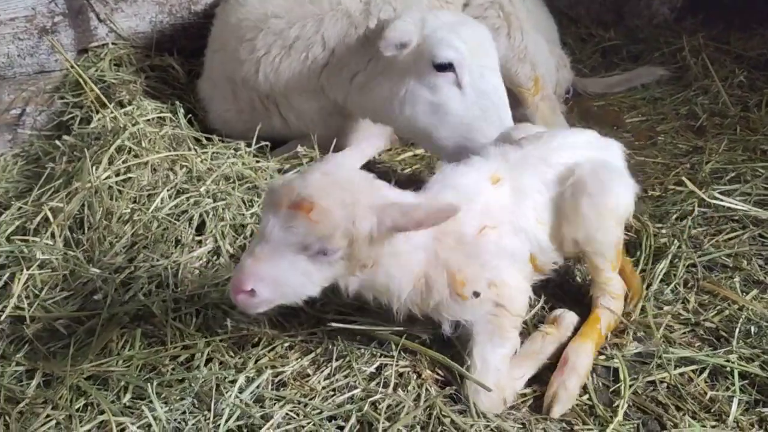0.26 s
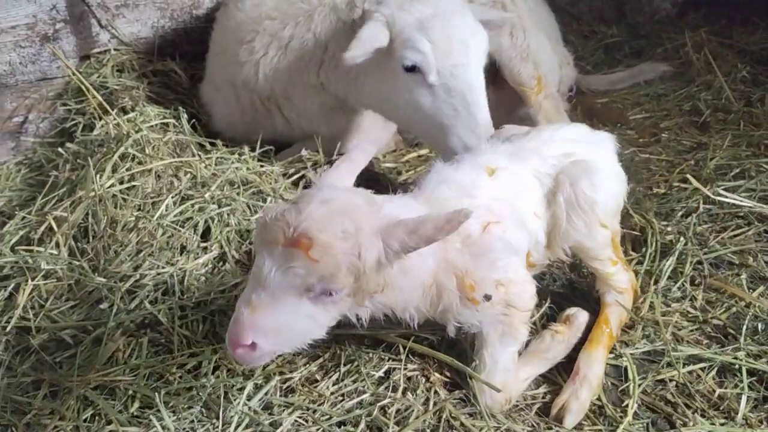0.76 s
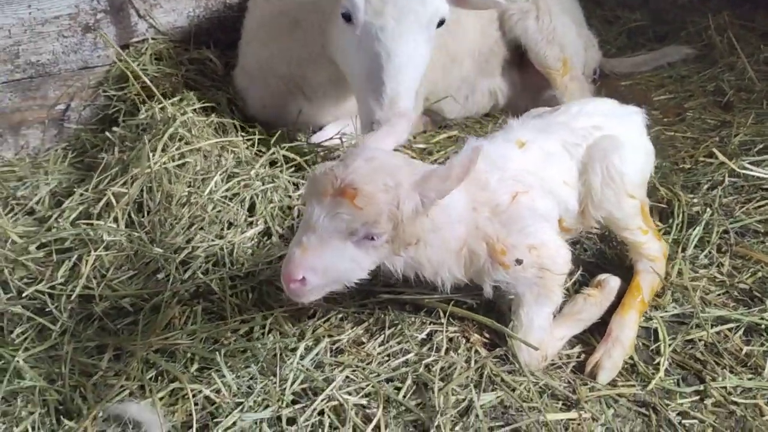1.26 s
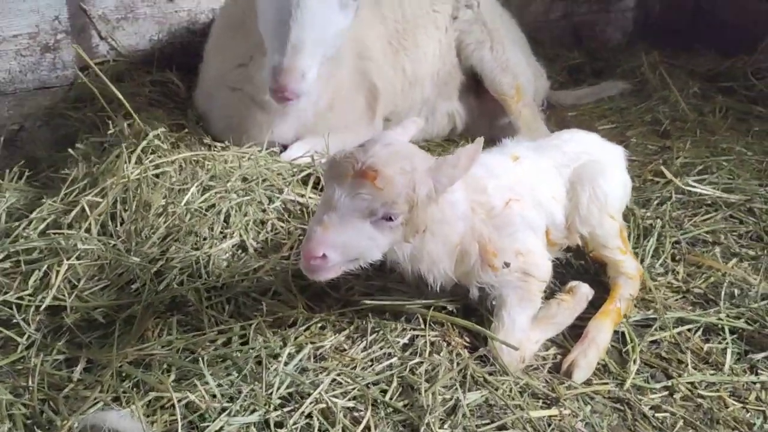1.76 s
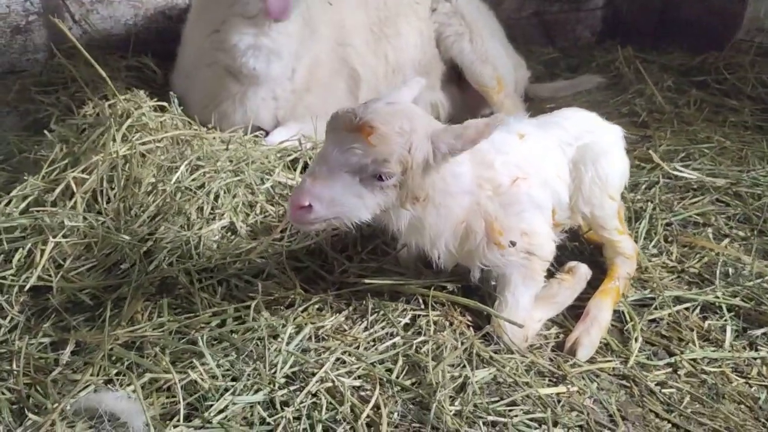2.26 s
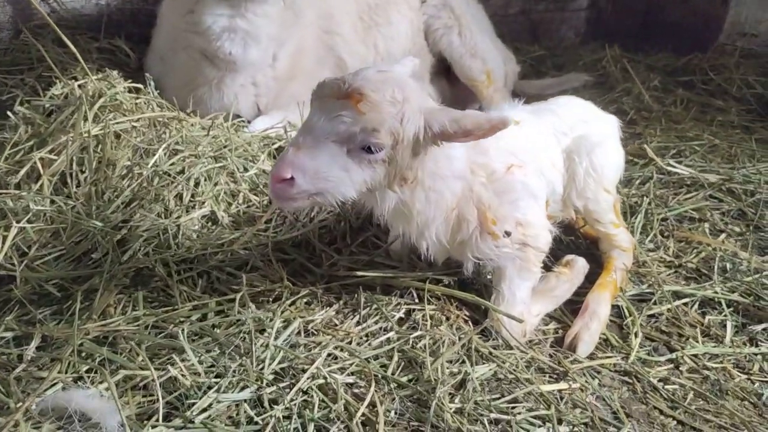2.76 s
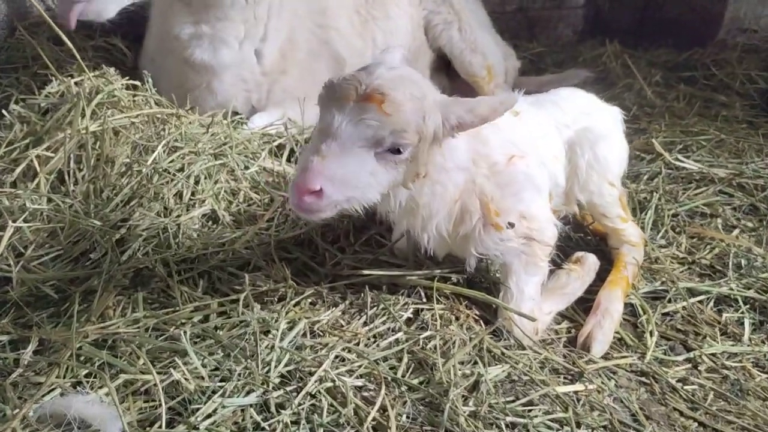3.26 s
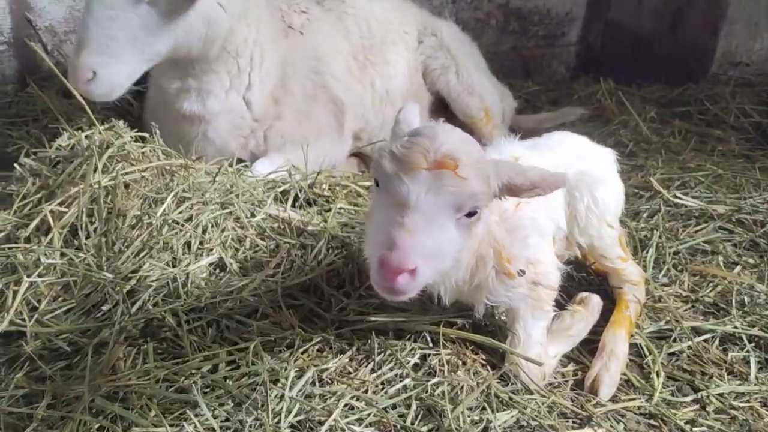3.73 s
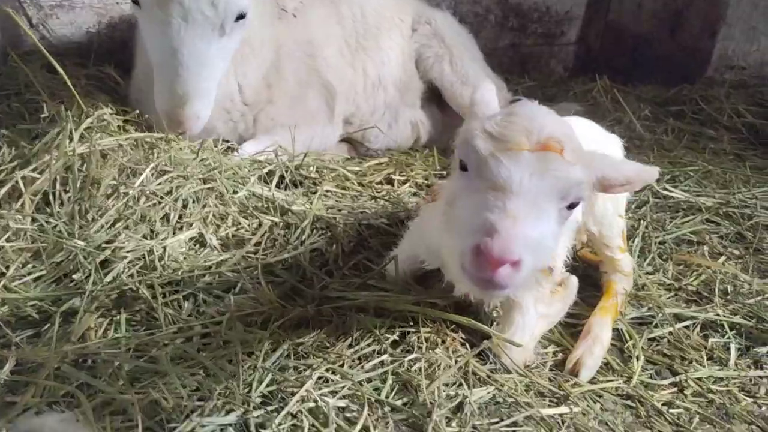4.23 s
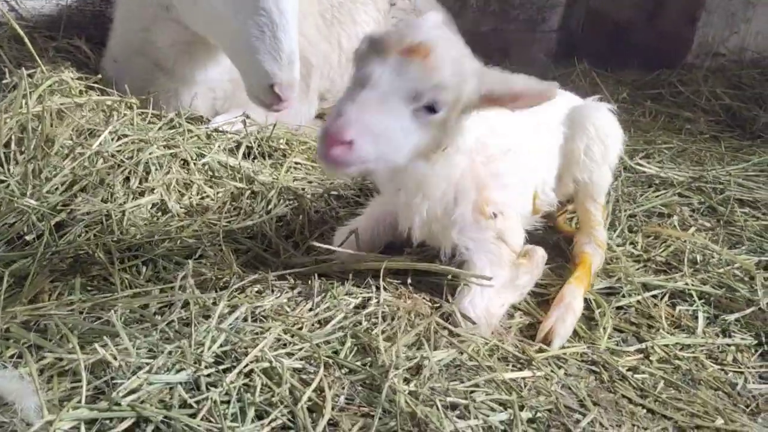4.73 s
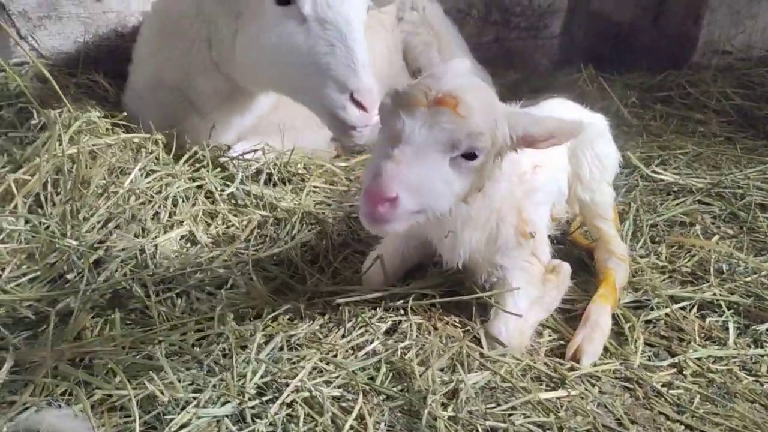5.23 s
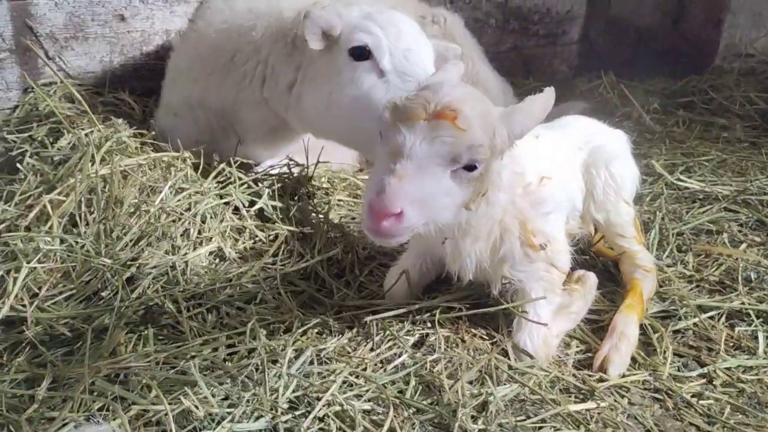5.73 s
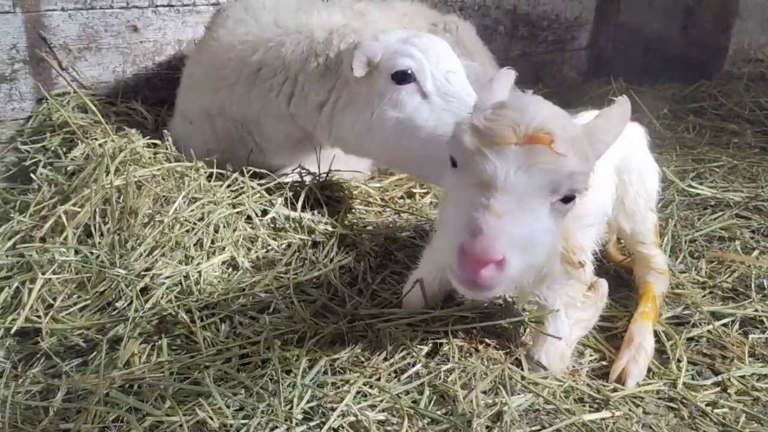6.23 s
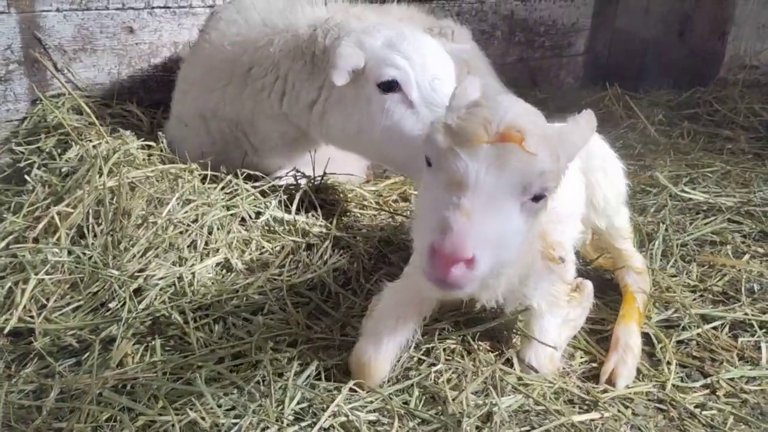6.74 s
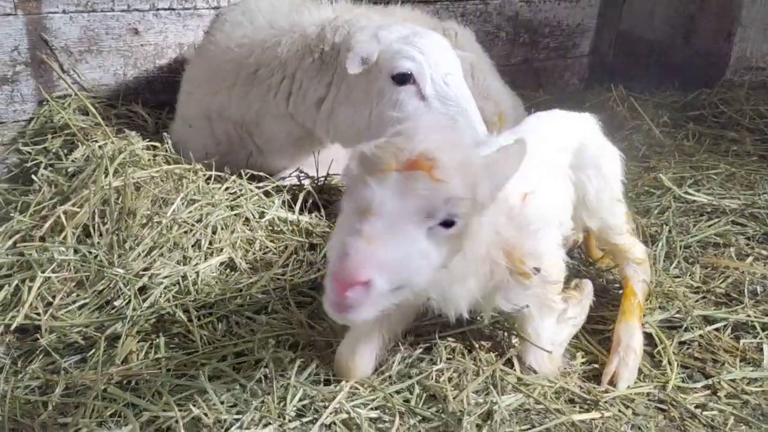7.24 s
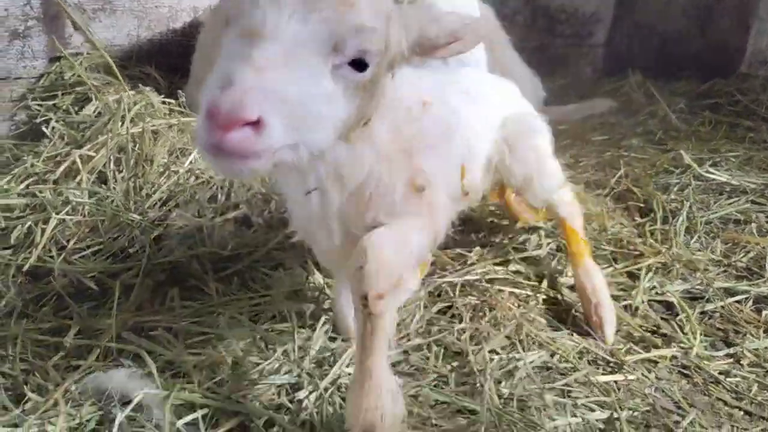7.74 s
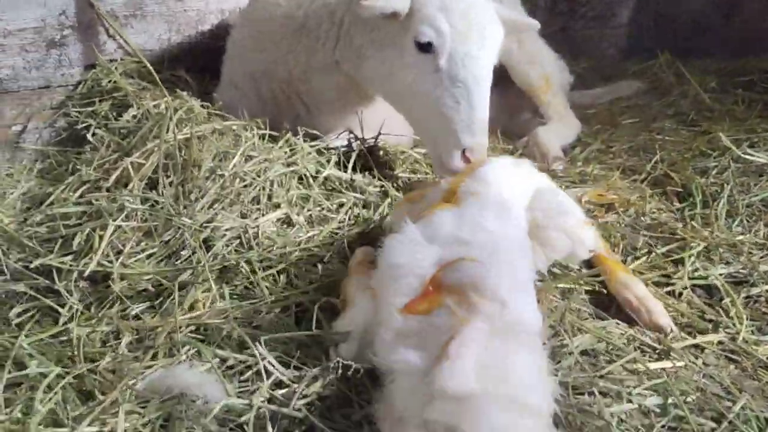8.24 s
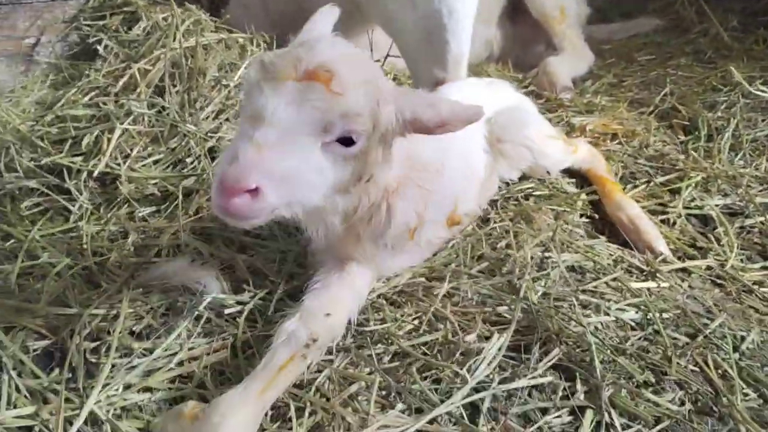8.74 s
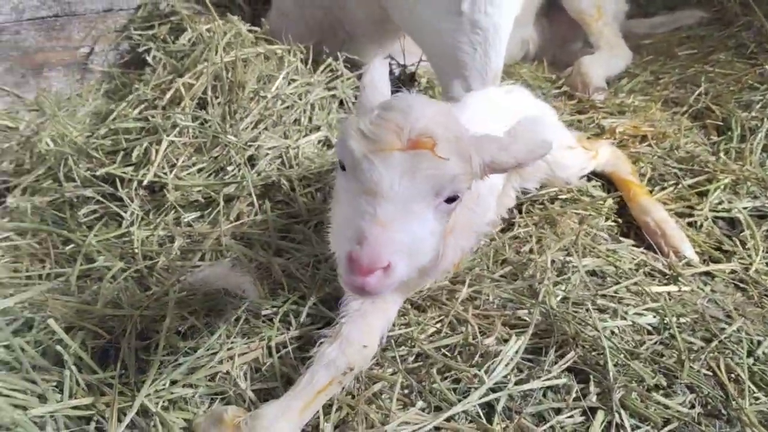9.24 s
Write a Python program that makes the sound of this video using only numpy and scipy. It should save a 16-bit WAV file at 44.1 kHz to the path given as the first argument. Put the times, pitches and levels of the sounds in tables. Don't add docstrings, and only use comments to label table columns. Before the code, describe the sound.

Quiet barn air and dry stalks ticking; then a small indrawn breath and a bright, nasal, trembling lamb bleat, very near, with the ewe murmuring low beneath. Later come a soft thump, tiny wet licking, a clipped bleat, a pause with straw snaps, and a second long wavering bleat. A sharp rustling fall and a faint hoarse far sheep close it, with only a short room tail.

```python
import sys
import numpy as np
from scipy import signal
from scipy.fft import rfft, irfft, next_fast_len
from scipy.io import wavfile
from scipy.ndimage import uniform_filter1d, map_coordinates

SR = 44100
rng = np.random.default_rng(int(sys.argv[2]) if len(sys.argv) > 2 else 0)


def log_audio(samples):
    frames = np.atleast_2d(samples).T
    limited = np.clip(frames, -1, 1)
    pcm = np.round(limited * 32767).astype(np.int16)
    wavfile.write(sys.argv[1], SR, pcm)


def to_linear_factor(level_db):
    exponent = np.asarray(level_db, float) / 20
    return 10 ** exponent


N = 418509


def unit(x):
    return x / np.sqrt(np.mean(x ** 2) + 1e-20)


def along(points, hz):
    f, v = np.transpose(points)
    return np.interp(np.log(hz + 1), np.log(f + 1), v)


def level(rows):
    return np.interp(np.arange(N) / SR, *np.transpose(rows))


def bump(s, centre, width):
    return np.exp(-((s - centre) / width) ** 2)


def wobble(rate, count):
    knots = rng.standard_normal(int(count * rate / SR) + 4)
    return map_coordinates(knots, [np.arange(count) * rate / SR])


def filtered(x, response):
    m = next_fast_len(N + SR // 2)
    return irfft(rfft(x, m) * response(np.fft.rfftfreq(m, 1 / SR)), m)[..., :N]


def hiss(spectrum, alike=0):
    own, shared = rng.standard_normal((2, N)), rng.standard_normal(N)
    mixed = np.sqrt(1 - alike) * own + np.sqrt(alike) * shared
    return unit(filtered(mixed, lambda hz: to_linear_factor(along(spectrum, hz))))


def voice(s, pitch, db, throat, rough, trim=None, jitter=.002, order=1, clear_hz=1):
    step = 64
    start, n = round(s[0] * SR), round((s[-1] - s[0]) * SR)
    t = np.arange(0, n + step, step)

    def at(curve):
        return np.interp((start + t) / SR, s, curve * np.ones(len(s)))

    f0 = np.interp((start + t) / SR, *np.transpose(pitch))
    k = np.arange(1, int(16000 / f0.min()))[:, None]
    f = k * f0
    tract = 0
    for j, (centre, width, db_peak) in enumerate(throat):
        damping = 1j * f * width
        tract = tract + (-1) ** j * to_linear_factor(db_peak) * damping / (at(centre) ** 2 - f * f + damping)
    tract = tract ** order
    tract = tract / np.sqrt(np.sum(abs(tract) ** 2, 0) / 2)
    if trim:
        tract = tract * to_linear_factor(trim(f, at))
    shape = irfft(np.log(abs(np.vstack([tract[:1], tract])) + 1e-5), axis=0)
    shape[len(k) + 1:] = 0
    tract = abs(tract) * np.exp(2j * rfft(shape, axis=0).imag[1:])
    share = np.clip(at(rough), 0, 1) / (1 + (clear_hz / f) ** 2)
    smear = rng.standard_normal(f.shape) + 1j * rng.standard_normal(f.shape)
    patches = uniform_filter1d(rng.standard_normal(f.shape), size=40, axis=1)
    patches = uniform_filter1d(patches, size=3, axis=0)
    patch_db = 2 / (1 + (1800 / f) ** 4) + 3.5 / (1 + (7500 / f) ** 4)
    tract = tract * to_linear_factor(unit(patches) * patch_db)
    size = to_linear_factor(at(db)) * tract * (np.sqrt(1 - share) + np.sqrt(share) * smear)
    i = np.arange(n)
    turns = np.cumsum(np.interp(i, t, f0) * (1 + jitter * wobble(90, n))) / SR
    part = (i % step) / step
    after = np.minimum(i // step + 1, len(t) - 1)
    size = size[:, i // step] * (1 - part) + size[:, after] * part
    out = np.zeros(N)
    overtones = np.real(size * np.exp(2j * np.pi * k * turns))
    out[start:start + n] = overtones.sum(0) * signal.windows.tukey(n, min(1, 400 / n))
    return out


# start_s, level_db
STIR = [(0, -71.5), (.372, -63), (.86, -75), (1.24, -74.5), (2.1, -63), (2.54, -65.5), (2.8, -62.5),
        (3.0, -71.5), (3.57, -72), (3.79, -78.5), (4.1, -73), (5.4, -71), (5.85, -74), (6.636, -64),
        (6.92, -73.5), (7.78, -59), (8.2, -67), (8.65, -70)]


def stirring():
    return level(STIR)


# start_s, level_db
RUMBLE = [(0, -71.5), (.9, -72.5), (1.42, -60.5), (2.13, -61), (2.4, -70), (3.24, -67), (3.65, -74.5),
          (4.25, -74), (5.6, -64.5), (6.6, -77), (7.3, -66), (7.85, -72.5), (8.07, -62), (8.45, -71),
          (9.35, -63)]
# freq_hz, density_db (per Hz)
RUMBLE_COLOUR = [(15, -44.5), (25, -19.5), (48, -10.5), (70, -3.5), (92, 2), (188, -3.5), (400, -19.5),
                 (520, -52.5), (880, -120)]
# freq_hz, density_db (per Hz)
AIR_COLOUR = [(88, -17), (150, -11.5), (309, -1.5), (1210, -10), (3620, -17), (4490, -25), (8730, -7),
              (16000, -18.5)]


def barn():
    lumps, rumble_db, stir_db = to_linear_factor(4.5 * wobble(3.9, N)), level(RUMBLE), stirring()
    air_db = -72.5 + 0.44 * (stir_db - stir_db.mean()) + 0.82 * (rumble_db - rumble_db.mean())
    rumble = to_linear_factor(rumble_db) * unit(lumps * hiss(RUMBLE_COLOUR, 0.87))
    air = to_linear_factor(air_db + 7.0 + 0.68 * wobble(6.2, N)) * hiss(AIR_COLOUR, 0.059)
    return rumble + air


# peak_s, peak_db, dull_db, pan_db (twice the level difference between the ports)
SNAPS = [(0.1135, -52, -2.5, -5), (0.5837, -54.5, 3, 11), (0.673, -37.5, -16.5, 8),
         (1.039, -45.5, -30, 6.5), (1.1834, -54, -5.5, -5), (2.2936, -47, -26.5, 9),
         (2.4499, -38.5, -15.5, 4), (2.7112, -38.5, -28, -19), (2.971, -48, -29.5, 0),
         (3.374, -49, -31, -1), (3.448, -46.5, -31, 6), (3.644, -45, -24, 3), (3.6959, -29.5, -47.5, -16),
         (4.076, -44.5, -29.5, -5.5), (4.4552, -41, -37, -14), (5.202, -51, -19.5, 4),
         (5.448, -39, -28, 21), (5.6522, -30, -23, 8.5), (5.86, -40.5, -14.5, 4.5), (6.071, -45, -13, 12),
         (6.465, -31, -21, 1.5), (6.863, -43, -36, 11.5), (6.87, -28, -16.5, 6), (6.9406, -34.5, -42, 11),
         (7.787, -37, -33, 8.5), (7.874, -39.5, -29, 10.5), (7.9913, -18, -38, 14), (8.5725, -46, -11.5, 7),
         (8.589, -48, -30, 9), (8.6106, -35, -26.5, 15.5), (8.657, -48.5, -30.5, -2)]
# centre_s, peak_db, dull_db, half_width_s
SWEEPS = [(0.193, -64, -3.5, 0.043), (0.381, -53.5, -13, 0.0061), (.445, -56, -23, 0.011),
          (0.684, -51, -22, 0.021), (1.095, -58, -33, 0.026), (2.061, -50, -13.5, 0.012),
          (2.775, -56, -14, 0.032), (3.43, -57.5, -32.5, 0.02), (3.715, -51.5, -39, 0.026),
          (4.04, -63.5, -30, 0.024), (4.764, -50.5, -27.5, 0.02), (5.212, -61, -13, 0.01),
          (6.092, -57.5, -8.5, .015), (6.896, -53.5, -10.5, 0.013), (7.805, -41, -27, 0.023),
          (7.891, -47.5, -28, 0.02), (8.009, -35.5, -18.5, 0.024), (8.2, -50, -37, 0.021),
          (8.25, -47, -26, 0.033)]
# freq_hz, density_db (per Hz)
STRAW_COLOUR = [(880, -12.5), (1500, -12), (1920, -13.5), (2410, -18.5), (3310, -15), (7540, 8.5),
                (8570, 16.5), (11000, 9), (16000, 0.5)]


def straw():
    ticks = (rng.random(N) < 45 / SR) * rng.exponential(size=N)
    ticks = signal.fftconvolve(ticks, np.hanning(90), "same")
    stir_db = stirring()
    clumps = unit(to_linear_factor(4.6 * wobble(30, N) + 2.5 * wobble(440, N)) * (1 + 1.4 * ticks))
    bright, dull = to_linear_factor(3 + stir_db) * np.ones((2, 1)), np.zeros((2, N))
    u = np.arange(SR // 4) / SR

    for s, db, dull_db, pan_db in SNAPS:
        start = round((s - .0025) * SR)
        t60_s = 0.052 * to_linear_factor(.1 * (stir_db[start] - stir_db.mean()))
        decay = to_linear_factor(-60 * u / np.clip(t60_s, .02, .3)) * (1 - np.exp(-u / 0.0033))
        crack = 0.6 * np.exp(-abs(u - .003) / 0.00078)
        shape = to_linear_factor(db - 4.5) * (decay + crack) * to_linear_factor([[pan_db / 4], [-pan_db / 4]])
        shape = shape[:, :N - start]
        bright[:, start:start + len(u)] += shape
        dull[:, start:start + len(u)] += shape * to_linear_factor(dull_db)

    for s, db, dull_db, width in SWEEPS:
        start = round(s * SR) - len(u) // 2
        shape = to_linear_factor(db) * bump(u, u.mean(), width) * to_linear_factor([[7 / 4], [-7 / 4]])
        bright[:, start:start + len(u)] += shape
        dull[:, start:start + len(u)] += shape * to_linear_factor(dull_db)

    dull_colour = [(500, -38.0), (1000, 0.5), (2500, -1.0), (4500, -9), (7000, -43.0)]
    return clumps * bright * hiss(STRAW_COLOUR) + dull * hiss(dull_colour, 0.084)


# start_s, peak_db, pitch_hz, t60_s
THUMPS = [
    (4.125, -58, 94.2, 0.2),
    (4.886, -58, 123.3, 0.11),
    (4.966, -34.5, 98.2, 0.091),
    (5.017, -46.5, 90, 0.074),
    (5.07, -51, 95, 0.061),
    (7.996, -25, 96.5, 0.066),
]


def thumps():
    out, t = np.zeros(N + SR), np.arange(SR // 4) / SR
    for s, db, hz, t60 in THUMPS:
        push = to_linear_factor(db + 6.5 - 60 * t / t60) * (1 - np.exp(-t / 0.0125))
        tone = np.sin(2 * np.pi * hz * t) + 0.37 * np.sin(4.6 * np.pi * hz * t)
        out[round(s * SR):][:len(t)] += push * tone
    return out[:N]


# start_s, pitch_hz, hum_db, mouth_db (opening)
FAR = [
    (8.52, 154.3, -75, -3),
    (8.563, 173.6, -49, -30),
    (8.664, 164.5, -52, -15.5),
    (8.785, 152.6, -42, 2),
    (8.838, 125, -44.5, 8.5),
    (8.95, 125, -48, 15.5),
    (9.067, 121.2, -45.5, 10),
    (9.165, 106.7, -48.5, -1),
    (9.225, 110.6, -74, 3),
]
# centre_hz, width_hz, peak_db
FAR_HUM = [(125, 65, 0), (223, 80, 1.5)]
# centre_hz, width_hz, peak_db
FAR_RASP = [(603, 138, 1.5), (1100, 350, -5.5), (2280, 660, -17), (4920, 950, -18.5), (9100, 700, -14.5)]


def far_sheep():
    s, hz, hum_db, open_db = np.transpose(FAR)
    mouth_hz = 1510 - 6.5 * open_db + 510 * (s > 9.08)
    pitch = np.transpose([s, hz])
    throat = FAR_RASP[:2] + [(mouth_hz, 600, -1.5)] + FAR_RASP[2:]
    rasp = voice(s, pitch, hum_db + open_db, throat, .5, jitter=.05, order=2)
    hum = voice(s, pitch, hum_db, FAR_HUM, 0.28, jitter=0.045, order=2)
    return hum, rasp


# start_s, pitch_hz, level_db, mouth_db (opening)
EWE = [
    (1.22, 166.4, -113, -3),
    (1.301, 168.2, -57.5, 10),
    (1.37, 183.5, -48, 3),
    (1.47, 195.3, -41, 2),
    (1.599, 199.5, -38, 2),
    (1.802, 196.5, -40.5, 0.5),
    (2.028, 190.9, -40, 2),
    (2.2, 181.9, -42.5, 7),
    (2.295, 171.3, -58.5, 1),
]
# centre_hz, width_hz, peak_db
EWE_THROAT = [(188, 200, -5), (1790, 240, -4), (2400, 300, -8.5)]
# centre_s, half_width_s, loss_db
EWE_CATCHES = [
    (2.137, 0.012, 10),
    (2.215, 0.0094, 6),
]


def ewe():
    knots, *arc = np.transpose(EWE)
    s = np.linspace(knots[0], knots[-1], num=200)
    hz, db, open_db = (np.interp(s, knots, c) for c in arc)
    db = db - sum(loss * bump(s, at_s, width) for at_s, width, loss in EWE_CATCHES)
    breathy = .5 * np.exp(-(s - s[0]) / .09)
    creak = .9 / (1 + np.exp(-(s - 2.22) / .012))

    def trim(f, at):
        return at(open_db) * (f > 1200) - 8 * (f > 900) * (f < 1600)

    main_ring = (np.linspace(694, 770, len(s)), 150, 3.5)
    throat = EWE_THROAT[:1] + [main_ring] + EWE_THROAT[1:]
    return voice(s, np.transpose([s, hz]), db, throat, .03 + breathy + creak, trim, order=2, clear_hz=700)


# attack_s, peak_db, pitch_hz
LICKS = [(5.1, -62, 1994), (5.125, -65, 1897), (5.168, -60, 1290), (5.172, -63, 2045), (5.198, -53.5, 3144),
         (5.273, -54, 1100), (5.293, -58.5, 2950), (5.345, -56.5, 2900), (5.355, -51.5, 1070),
         (5.37, -50.5, 2700), (5.371, -52, 1100), (5.392, -58.5, 1100), (5.442, -54.5, 3130),
         (5.444, -47.5, 1202), (5.719, -58, 2038), (6.381, -54.5, 2907), (6.887, -44.5, 3500),
         (6.91, -54.5, 1752), (6.945, -49, 3272), (7.94, -51.5, 2744)]


def licks():
    out, t = np.zeros(N + SR), np.arange(SR // 4) / SR
    swell = np.sqrt(abs(np.sin(np.pi * np.clip(t / 0.024, 0, 1))))
    for s, db, hz in LICKS:
        breath = uniform_filter1d(rng.standard_normal(len(t)), size=60)
        clicks = to_linear_factor(2.7 * wobble(150, len(t)) - 5.5)
        puff = np.sin(2 * np.pi * hz * t) * breath * clicks
        out[round((s - .004) * SR):][:len(t)] += to_linear_factor(db + 15.5) * puff * swell
    return out[:N]


# start_s, mouth_db, nose_db
GASP = [
    (1.242, -80, -74.5),
    (1.329, -44, -40.5),
    (1.411, -42.5, -58.5),
    (1.438, -67, -64.5),
    (1.461, -34, -60.5),
]
GASP_RING = [4430, 4300, 3700, 3346, 3500]


def indrawn_breath():
    s, mouth_db, nose_db = np.transpose(GASP)
    rings = [(2000, 940, -4), (np.array(GASP_RING), 500, 0), (5000, 700, -12)]
    mouth = voice(s, [(0, 260)], mouth_db, rings, .18, jitter=.008, order=2)
    nose = voice(s, [(0, 59)], nose_db + 9.0, [(9085, 1640, 0)], 0.36, order=2)
    return mouth + nose


# start_s, pitch_hz, effort_db, jaw_db (opening)
BLEATS = [
    [(1.44, 303.4, -64, -8.5), (1.478, 298, -33.5, -9), (1.542, 294.3, -23.5, -9),
     (1.568, 295.9, -12.5, -4), (1.65, 304.2, -15, 3), (1.82, 305.3, -13.5, 4), (1.885, 290.2, -17, 1.5),
     (1.972, 271, -21, -0.5), (1.995, 270.5, -43.5, -5)],
    [(5.474, 327, -54, 0), (5.484, 319, -10.5, -0.5), (5.515, 287.7, -15, 1.5), (5.548, 302, -32, -11),
     (5.565, 261.1, -24.5, -5), (5.594, 270.9, -28, 5), (5.615, 249.3, -35.5, -6.5),
     (5.632, 256.4, -58, -4)],
    [(6.972, 271.2, -37.5, -12.5), (6.996, 289.3, -27, 2.5), (7.078, 287.9, -14.5, -0.5),
     (7.14, 300.6, -15, 0.5), (7.22, 296.7, -13.5, 0.5), (7.30, 271.4, -20.5, 0), (7.405, 289, -18, -2),
     (7.515, 273, -17.5, -1.5), (7.548, 268, -42.5, -12)],
]
# centre_hz, width_hz, peak_db
THROATS = [
    [(794, 980, -11), (1284, 340, 1), (2700, 320, -12.5), (3680, 320, 2), (8200, 310, -1.5),
     (10040, 1400, -17)],
    [(795, 1200, -17.5), (1386, 750, 1), (3030, 220, -0.5), (3580, 300, 1), (7973, 1000, -8.5)],
    [(884, 3300, -23.5), (1357, 390, 1), (2900, 250, -8), (3570, 200, 6), (8440, 440, -4.5),
     (10500, 5700, -10.5)],
]
# centre_s, half_width_s, loss_db, dip_hz, choke_db (further chest loss)
CATCHES = [(1.602, 0.022, 6, 11.5, 4.5), (1.688, .015, 1, 4, 0.5), (1.757, .03, 3, 12, 3),
           (1.878, 0.014, 3.5, 2.5, -1), (1.935, 0.01, 2.5, -3.5, -1.5), (5.525, .01, 1.5, 2.5, 6),
           (7.006, 0.02, -4.5, -2, 8), (7.048, .018, 14.5, 11.5, -8), (7.099, .017, 11, 27, 12.5),
           (7.183, .014, 1, 3, 0), (7.237, .012, 4, 3, -1), (7.282, 0.015, 3, 12.5, -2),
           (7.365, 0.026, 2.5, 20, -2)]
HOARSE = [.02, .22, .03]
# chest_db, upper_ring_db, edge_db, nasal_hum_db, mouth_ring_hz
FIRST_COLOUR = [(-7.5, 9.5, -11, -33, 4490), (-14.5, -23, -24, -30.5, 5100), (-15.5, -13, -12, -38, 5450)]
LAST_COLOUR = [(-15.5, -42, -28, -30.5, 4520), (-4.5, -15, -4.5, -7.5, 5200), (-8.5, 9, -26.5, -25.5, 4700)]
# start_hz, end_hz
UPPER_RING = [(6230, 5800), (5940, 6000), (5860, 5850)]
# start_db, end_db
THROAT_DRIFT = [(5, -3), (1, -5), (-1.5, -4)]
# start_db, end_db
MOUTH_DRIFT = [(-1, 8), (2.5, -3), (4.5, -0.5)]
VALLEY = [-5.5, -6.5, -4]
# centre_s, half_width_s, gain_db, otherwise_db
SHINE = [(1.72, 0.25, 2, -5), (5.511, 0.051, 0, -8.5), (7.16, 0.15, 9.5, -7)]


def above(f, hz):
    return 1 / (1 + (hz / f) ** 8)


def bleat(i):
    knots, *arc = np.transpose(BLEATS[i])
    s = np.linspace(knots[0], knots[-1], num=200)
    hz, db, jaw_db = (np.interp(s, knots, c) for c in arc)
    catches = (np.outer(depth, bump(s, at_s, width)) for at_s, width, *depth in CATCHES)
    loss_db, dip_hz, choke_db = sum(catches)
    centre_s, width_s, gain_db, rest_db = SHINE[i]
    shine_db = rest_db + (gain_db - rest_db) * bump(s, centre_s, width_s) ** 2
    broken = 1 / (1 + np.exp(-(s - s[-1] + .039) / .006)) * (s[-1] - s[0] > .3)
    hz = hz - dip_hz - 24 * broken
    colours = np.linspace(FIRST_COLOUR[i], LAST_COLOUR[i], len(s)).T
    chest_db, ring_db, edge_db, hum_db, mouth_hz = colours
    chest_db = chest_db + jaw_db - choke_db
    ring_db = ring_db - 0.81 * jaw_db
    mouth_db = 0.79 * jaw_db + np.linspace(*MOUTH_DRIFT[i], len(s))
    throat_db = np.linspace(*THROAT_DRIFT[i], len(s))
    db = db - loss_db
    top_hz = np.linspace(10500, 16000, len(s))

    def trim(f, at):
        gain = (at(chest_db) + 11.0) * (1 - above(f, 2200))
        gain = gain + (at(ring_db) + 15.0) * (above(f, 5850) - above(f, 7200))
        gain = gain + (at(edge_db) + 19) * above(f, 6100)
        gain = gain + at(mouth_db) * (above(f, 4000) - above(f, 5700))
        gain = gain + at(throat_db) * (above(f, 3000) - above(f, 4400))
        gain = gain - 40 * (f < 420)
        gain = gain + VALLEY[i] * (above(f, 1800) - above(f, 2800))
        gain = gain + at(shine_db) * above(f, 8600)
        return gain - 30 * (1 - (1 - above(f, 1.3 * at(top_hz))) ** 3)

    rings = [(mouth_hz, 450, -.3), (np.linspace(*UPPER_RING[i], len(s)), 350, -4)]
    throat = THROATS[i][:4] + rings + THROATS[i][4:] + [(top_hz, 1600, -2.5)]
    rough = HOARSE[i] + .4 * broken + .008 * abs(loss_db)
    pitch = np.transpose([s, hz])
    cry = voice(s, pitch, db, throat, rough, trim, clear_hz=3000)
    nasal_hum = voice(s, pitch, db + hum_db + 4.5, [(270, 22, 0)], 0, order=3)
    return cry + nasal_hum


def lamb():
    return indrawn_breath() + sum(bleat(i) for i in range(len(BLEATS)))


# delay_s, level_db
WALLS = [
    [(.0009, -11.5), (.0021, -5.5), (.0046, -19.5)],
    [(.0012, -20), (.0027, -6.5), (.0058, -20.5)],
]


def nearby(x, lag_s, from_hz=0):
    def echoes(hz, port):
        returns = sum(to_linear_factor(db) * np.exp(-2j * np.pi * hz * s) for s, db in WALLS[port])
        return returns / (1 + (1500 / (hz + 1)) ** 2)

    def ports(hz):
        late = np.exp(-2j * np.pi * np.maximum(hz - from_hz, 0) * lag_s)
        return np.array([1 + echoes(hz, 0), late * (1 + echoes(hz, 1))])

    return filtered(x, ports)


# freq_hz, t60_s
PEN = [(200, 0.23), (2000, 0.18), (10000, 0.074)]


def pen(x):
    hz, t, z = signal.stft(rng.standard_normal((2, SR // 2)), SR, nperseg=256)
    fade = to_linear_factor(-60 * t / along(PEN, hz)[:, None])
    tail = signal.istft(z * fade, SR, nperseg=256)[1]
    tail = tail / np.linalg.norm(tail[0])
    return signal.fftconvolve(np.pad(x, (200, 0))[None], tail, axes=1)[:, :N]


# centre_s, half_width_s
FACING = (7.25, 0.42)


def scene():
    young, mother, (hum, rasp) = lamb(), ewe(), far_sheep()
    near, facing = to_linear_factor(-6.5) * young, bump(np.arange(N) / SR, *FACING) ** 2
    close = nearby(facing * near, .00007, 2580) + nearby((1 - facing) * near, .0003, 2580)
    close = close + nearby(mother + licks() + thumps() + to_linear_factor(-6.5) * rasp, .0001)
    sent = to_linear_factor(-19) * young + to_linear_factor(-9) * mother + to_linear_factor(0.5) * rasp
    tails = filtered(pen(sent), lambda hz: hz / (hz + 302))
    return close + tails + hum + straw() + barn()


def roll_off(x):
    return signal.sosfilt(signal.butter(12, 16500, fs=SR, output="sos"), x)


# freq_hz, gain_db
PORTS = [
    [(100, 5), (400, 0), (1300, 1), (2400, 1.5), (5000, 5.5), (6800, 1), (8500, 3), (11000, -3.5),
     (15000, -4.5)],
    [(100, 5), (400, -4.5), (1300, 1), (2400, 7.5), (5000, 13), (6800, 6), (9200, -20), (11000, -13.5),
     (15000, -11)],
]


def record(dry):
    ports = filtered(dry, lambda hz: to_linear_factor([along(port, hz) for port in PORTS]))
    held = ports / (1 + abs(ports / .97) ** 12) ** (1 / 12)
    band = filtered(held, lambda hz: (hz < 15900) / (1 + (65 / (hz + 1)) ** 3))
    return roll_off(band)


dry = scene()
out = record(dry)
log_audio(out)
```